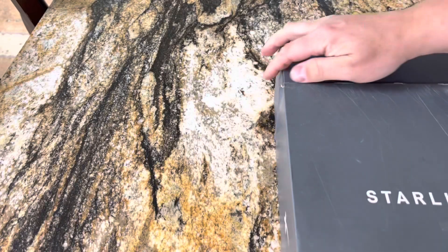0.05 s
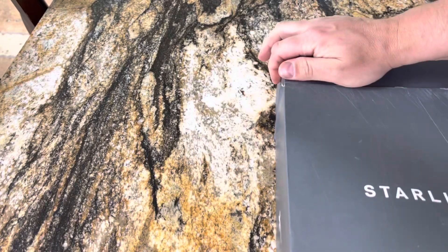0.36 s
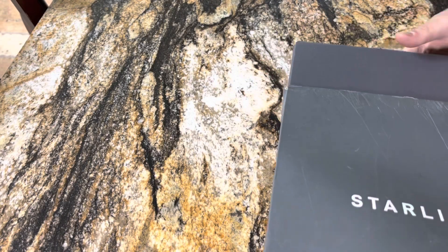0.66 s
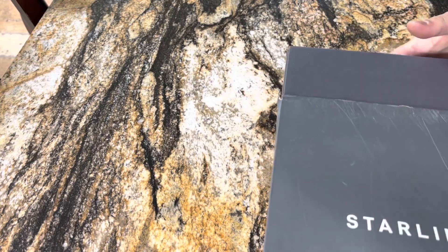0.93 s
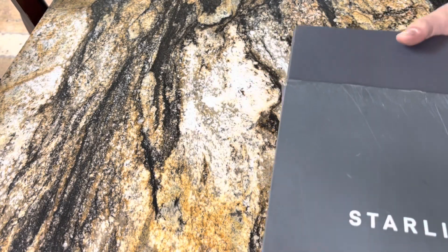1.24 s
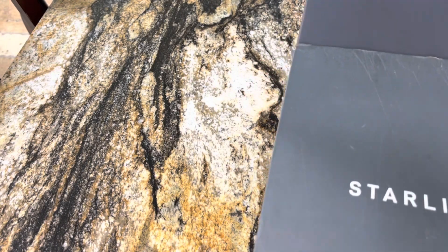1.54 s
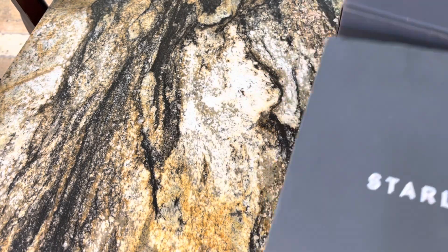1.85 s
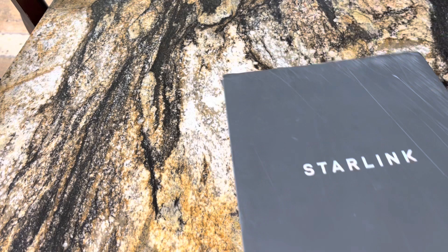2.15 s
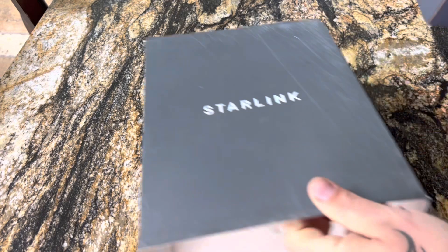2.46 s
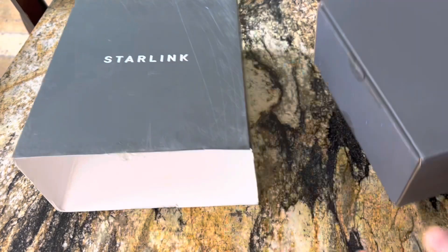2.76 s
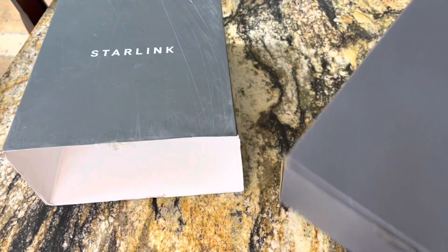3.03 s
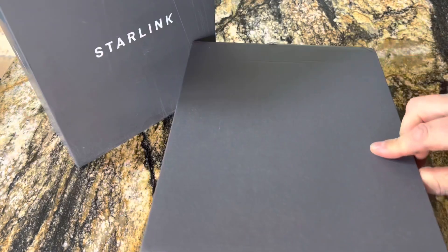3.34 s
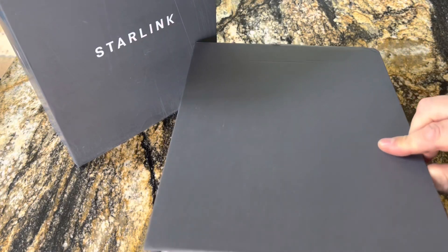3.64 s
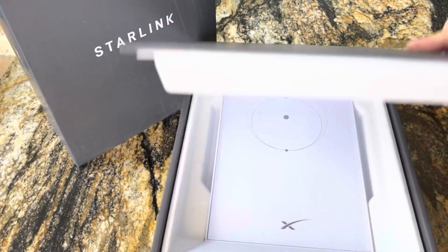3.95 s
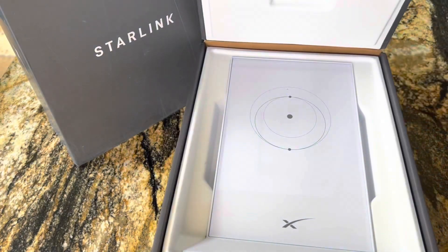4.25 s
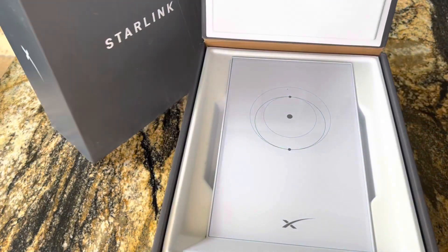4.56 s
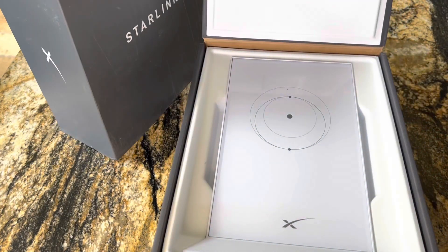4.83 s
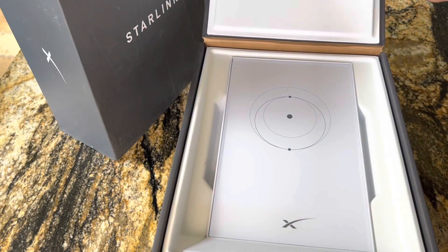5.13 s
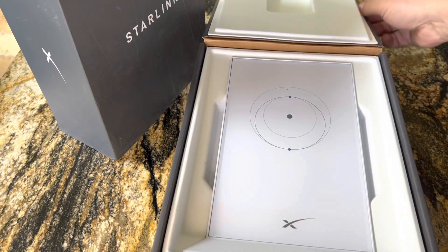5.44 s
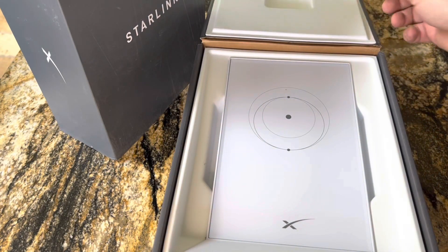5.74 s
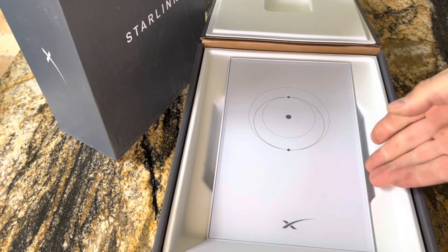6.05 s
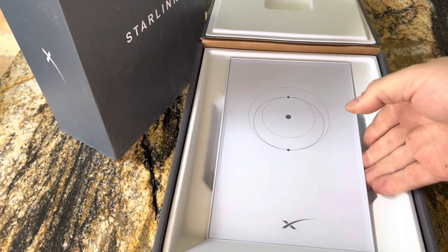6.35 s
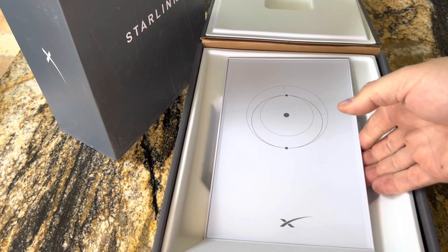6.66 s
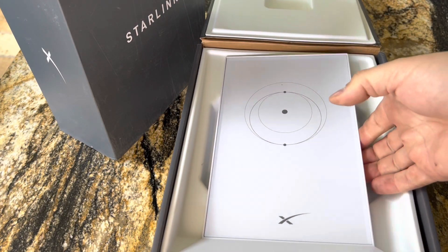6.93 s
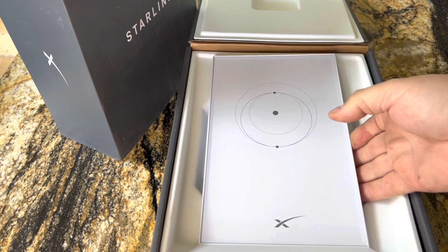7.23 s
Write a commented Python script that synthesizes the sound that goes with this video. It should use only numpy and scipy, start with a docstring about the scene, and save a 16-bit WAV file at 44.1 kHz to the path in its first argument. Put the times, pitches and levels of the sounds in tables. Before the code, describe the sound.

Hands rub and shift a rigid cardboard box close to a stereo pair of microphones, with light taps, scrapes and a firmer knock at about 0.7 seconds. From 1.4 seconds the box rasps out of its sleeve, card squeaking and groaning against card, until a bump and a sharp snap free it at 1.9. Skin brushes the card and small ticks follow. At 3.1 and 3.3 seconds the box lands on a stone countertop in two solid knocks, with a short drag between them. Quieter rubs and taps continue as the lid swings open. At 5.5 seconds it flops back with the loudest knock and a brief rattle. From 6 to about 7.2 seconds fingers rub, tick and tap softly at the tray inside. The kitchen's hard walls give the knocks a short echo, and a low appliance hum runs underneath.

```python
"""A live kitchen, a stereo pair of microphones close to a stone countertop, a low hum underneath.
A rigid cardboard box is drawn out of its sleeve: card rubs and squeals on card in stick-slip,
and the empty sleeve snaps free. The box is set down in two knocks with a short drag between them,
its lid swings open and flops back, and fingers work at the tray inside. Each knock cracks, flexes
and rings a panel, and the hard walls answer."""
import sys
import numpy as np
from scipy import signal
from scipy.fft import rfft, irfft, next_fast_len
from scipy.io import wavfile
from scipy.ndimage import map_coordinates

SR = 44100
rng = np.random.default_rng(int(sys.argv[2]) if len(sys.argv) > 2 else 0)


def waveform_to_disk(signal):
    """Save audio, clipped to [-1, 1], as 16-bit WAV at the path in sys.argv[1]."""
    frames = np.transpose(np.atleast_2d(signal))
    scaled = np.clip(frames, -1, 1) * 32767
    samples = np.round(scaled).astype(np.int16)
    wavfile.write(sys.argv[1], SR, samples)


N = 321577
TIME = np.arange(N) / SR
CUTOFF_HZ = 16100
RUB_ATTACK_S, RUB_RELEASE_S = 0.036, 0.03

# spectra of the noises at the microphones: (frequency [Hz], relative density [dB])
AIR_SPECTRUM = [(25, -19.5), (64, -2), (145, -7.5), (293, -7.5), (516, -18), (1500, -26.5), (3000, -35),
                (7000, -42.5), (16000, -62)]
BRUSH_SPECTRUM = [(1500, -13), (4000, -3), (6200, -3.5), (8700, 4), (12000, 2), (15500, -6.5)]
RUB_SPECTRUM = [(120, -3), (300, -0.5), (480, -5.5), (720, -6), (1300, -3.5), (1700, -4), (2100, -5.5),
                (2700, -10), (4200, -13), (6200, -19), (8700, -12.5), (15000, -24.5)]
CARD_CRACK_SPECTRUM = [(300, -21), (900, -5), (1900, -9.5), (5000, -24), (10000, -26.5), (16000, -37)]
SLIDE_SPECTRUM = [(120, -5), (330, 2.5), (600, -1), (1100, -9), (2100, -8.5), (2800, -16), (6000, -21.5),
                  (11500, -19), (16000, -32)]
LOW_SWELL_SPECTRUM = [(20, -33), (40, -12), (58, 30), (85, 11), (130, -9.5), (260, -39)]
DRAG_SPECTRUM = [(100, -11), (240, -1), (700, -12), (1100, -13.5), (2800, -31), (9000, -31), (16000, -34)]
TRAY_CRACK_SPECTRUM = [(650, -10.5), (950, 1.5), (1250, -10), (1650, -7), (2100, -14.5), (4000, -16),
                       (5200, -24.5), (9000, -20.5), (16000, -23)]
# an appliance hums: (frequency [Hz], relative level [dB])
HUM_TONES = [(59.2, -55.5), (102.3, -64.5)]
# skin over smooth card: (start [s], length [s], level [dB])
SKIN_BRUSHES = [(-0.04, 0.14, -52.5), (0.393, .11, -46.5), (1.16, 0.14, -58), (1.947, 0.19, -52),
                (2.273, 0.028, -41), (2.369, 0.096, -48), (2.527, 0.24, -53.5), (5.174, 0.24, -70)]
# card shifts under the hands: (start [s], length [s], rasp level [dB], brightness [dB])
CARD_RUBS = [(-0.03, 0.69, -54.5, 4), (0.47, 0.085, -48.5, -3), (0.603, 0.045, -48, -1.5),
             (0.699, 0.083, -52, -4.5), (0.753, 0.19, -58.5, 4), (1.038, 0.045, -48, -6),
             (1.093, 0.063, -55, 3), (1.167, 0.068, -48, 0), (1.235, 0.21, -59, -1),
             (2.13, 0.37, -55.5, 4.5), (2.604, 0.13, -81, -6), (3.531, 0.16, -62, 3.5),
             (3.758, 0.38, -67, -5), (4.85, 0.17, -62.5, 5.5), (5.063, 0.079, -61, -6),
             (5.976, 0.18, -56.5, -3), (6.152, 0.088, -54, -5), (6.887, 0.28, -57.5, -2.5),
             (7.086, 0.11, -48, -1)]
# edges scrape with a ring: (start [s], length [s], resonance [Hz], level [dB])
EDGE_SCRAPES = [(0.056, 0.21, 1950, -59), (0.267, 0.073, 7830, -47), (0.457, 0.13, 2000, -48.5),
                (0.494, 0.08, 714, -45), (1.57, 0.042, 288, -32), (1.674, 0.045, 2080, -29.5),
                (2.576, 0.035, 574, -43.5), (2.674, 0.16, 3430, -60.5), (3.967, 0.2, 1680, -65.5),
                (4.498, 0.06, 4400, -61.5)]
# blows on the full box, the empty sleeve, and the lid and moulded tray:
# (time [s], relative level [dB], flex pitch [Hz], hardness [dB], room send [dB])
BOX_BLOWS = [(0.162, -30.5, 167, -50, -38), (0.65, -20.5, 221, -36, -16), (0.771, -36.5, 227, -10.5, -4),
             (1.067, -32, 295, -38, -8.5), (1.08, -38, 690, -4.5, -15), (1.203, -30.5, 352, -38, -5),
             (1.232, -50, 654, 9.5, -29), (1.813, -17, 393, -42, -16.5), (1.82, -21.5, 168, -25, -13.5),
             (2.553, -35, 430, -22.5, -4), (2.607, -32.5, 250, -41, -9.5), (3.098, -28, 108, -25, -26),
             (3.127, -13.5, 740, -16.5, -26.5), (3.128, -10.5, 258, -42, -17.5),
             (3.3058, -15, 645, -17.5, -50.5), (3.3075, -7, 196, -35, -69), (3.518, -37, 235, -50, -4),
             (3.798, -44, 510, -24.5, -17), (3.9255, -34.5, 460, -38, -23), (3.966, -39, 220, -23, -16),
             (4.597, -43, 477, -17, -8)]
SLEEVE_BLOWS = [(1.9134, -9.5, 780, -1, -9.5), (1.9285, -19.5, 560, -32, -6), (1.9338, -17, 310, -42, -11)]
TRAY_BLOWS = [(4.433, -34, 860, -8, -3.5), (5.4883, -1.5, 455, -20, -11.5), (5.5188, -16.5, 476, -19, -20),
              (5.524, -16.5, 320, -27, -28), (5.543, -23, 433, -24, -24), (5.9895, -40.5, 245, -13, -31),
              (6.047, -30.5, 372, -38, -6.5), (7.067, -32, 383, -22, 1), (7.117, -30, 252, -31, -22)]
# the modes each one rings with: (frequency [Hz], relative level [dB], t60 [s])
BOX_RING = [(231, -15.5, 0.15), (388, -1, 0.064), (554, 8.5, 0.034), (684, 1, 0.038), (915, 0.5, 0.036),
            (1212, -3.5, 0.036), (1530, 1, 0.028), (2250, -9, 0.026)]
SLEEVE_RING = [(322, -10.5, 0.052), (575, -2.5, 0.065), (660, -11, 0.092), (1075, -9.5, 0.089),
               (1644, -8.5, 0.018), (2010, -4, 0.018), (3050, -16, 0.0087)]
TRAY_RING = [(132, -9.5, 0.15), (296, -1, 0.06), (444.5, -15, 0.43), (571, -8.5, 0.26), (518, -19, 0.9),
             (914, -22.5, 0.4)]
# the kitchen's reverberation: (frequency [Hz], relative level [dB], t60 [s])
ROOM_TAIL = [(100, 2.5, 0.96), (283.5, 14.5, 0.43), (447, -4.5, 1), (880, 3.5, 0.96), (2015, 4, 0.97),
             (5440, 7, 0.83), (8470, 13, 0.56), (15400, -15, 0.17)]
# fingernails and card edges catch: (time [s], level [dB], centre [Hz])
NAIL_TICKS = [(0.471, -30.5, 3530), (2.305, -51, 9400), (2.574, -38, 7500), (2.596, -39, 1480),
              (2.741, -40, 11000), (2.861, -41, 10500), (3.011, -55.5, 4030), (3.0883, -47, 9350),
              (4.434, -37, 2200), (4.442, -40, 1400), (4.45, -39.5, 2900), (4.952, -51.5, 10000),
              (5.509, -35, 9000), (5.519, -35, 3000), (6.642, -50.5, 5150), (6.667, -45.5, 5600),
              (7.154, -35, 1670)]
# speed of the box leaving the sleeve, given as its rasp: (time [s], level [dB])
SLIDE_RASP = [(1.41, -61.5), (1.5, -31.5), (1.575, -24.5), (1.66, -33), (1.73, -27), (1.8, -33),
              (1.855, -42), (1.875, -60), (1.905, -50)]
# brief squeaks: (start [s], length [s], first pitch [Hz], last pitch [Hz], relative level [dB])
SLEEVE_SQUEAKS = [(1.478, .04, 580, 640, -28), (1.533, .04, 640, 670, -33), (1.49, .06, 880, 1250, -34),
                  (1.558, .04, 1780, 1600, -29), (1.704, .018, 740, 860, -25),
                  (1.74, .055, 1150, 1020, -31), (1.762, .016, 2010, 1970, -23),
                  (1.755, .055, 2600, 3200, -39)]
# one stick-slip tone where the sleeve grips hardest: (time [s], pitch [Hz], relative level [dB])
SLEEVE_GROAN = [(1.588, 725, -31), (1.602, 720, -25), (1.635, 655, -28), (1.674, 475, -20),
                (1.694, 620, -27)]
# brief swells of low rumble: (start [s], length [s], level [dB])
LOW_SWELLS = [(1.813, 0.041, -32), (1.935, 0.088, -34.5), (3.095, 0.12, -37), (4.981, 0.12, -35),
              (6.724, 0.15, -42.5)]
# width of the stereo image: (frequency [Hz], side minus mid [dB])
STEREO_WIDTH = [(60, -17.5), (200, -14), (380, -6), (700, -4), (1290, -5), (2380, -3.5), (5500, -2),
                (8500, -13.5), (15000, -64)]
# balance of the microphones: (frequency [Hz], left minus right [dB])
MIC_BALANCE = [(60, 0.5), (200, -1.7), (450, 0), (1200, 0.7), (3500, 2.5), (8000, 0.5)]
# phase between the microphones: (frequency [Hz], lead of the left [rad])
MIC_PHASE = [(300, 0), (1500, -0.8), (3400, 0.5), (7300, 1), (8600, 0), (10200, -3.1), (11700, -6.2),
             (12700, -6.6), (13700, -9.4), (15200, -12.5)]


def from_db(db):
    """Decibels to gain."""
    return 10 ** (np.asarray(db) / 20)


def rms_one(x):
    """Scale to unit power."""
    return x / np.sqrt(np.mean(x ** 2) + 1e-20)


def at_hz(points, hz, column=1):
    """Read a table along log frequency."""
    table = np.array(points)
    return np.interp(np.log(np.maximum(hz, 1)), np.log(table[:, 0]), table[:, column])


def add(track, s, sound):
    """Mix a sound into a track at a time."""
    start = max(round(s * SR), 0)
    track[:, start:start + sound.shape[-1]] += sound[..., :N - start]


def band(x, low_hz, high_hz, order=2):
    """Butterworth band-pass."""
    sos = signal.butter(order, [low_hz, min(high_hz, .48 * SR)], "band", fs=SR, output="sos")
    return signal.sosfilt(sos, x)


def resonance(x, hz, octaves):
    """One band of a given width, at unit power."""
    return rms_one(band(x, hz * 2 ** (-octaves / 2), hz * 2 ** (octaves / 2)))


def drift(rate):
    """A random wander that turns about rate times a second."""
    knots = rng.standard_normal(N // 8)
    return np.interp(TIME * rate * 2, np.arange(len(knots)), knots)


def swell(length_s):
    """A smooth rise and fall."""
    return np.sin(np.linspace(0, np.pi, int(length_s * SR)))


def stroke(start_s, length_s, attack_s, release_s):
    """A movement gets going, holds and dies away."""
    age = TIME - start_s
    return np.clip(age / attack_s, 0, 1) * np.exp(-np.clip((age - length_s) / release_s, 0, 30))


def coloured(pair, spectrum):
    """Shape two excitations as mid and side; gives left and right at unit power."""
    size = next_fast_len(N)
    hz = np.arange(size // 2 + 1) * SR / size
    mid, side = rfft(pair, size) * from_db(at_hz(spectrum, hz)) * hz / (hz + 10)
    side = side * from_db(at_hz(STEREO_WIDTH, hz))
    return rms_one(irfft(np.array([mid + side, mid - side]), size)[:, :N])


def noise(spectrum):
    """Stereo noise with a spectrum."""
    return coloured(rng.standard_normal((2, N)), spectrum)


def friction(spectrum, grains_per_s, grain_db):
    """Fibres catch and let go in dense tiny slips."""
    slips = rng.random(N) < grains_per_s / SR
    strength = from_db(grain_db * np.minimum(rng.exponential(1, N), 4))
    return coloured(slips * strength * rng.standard_normal((2, N)), spectrum)


def rubbing(gains, spectrum, grains_per_s, grain_db, judder_db):
    """Under friction the panel booms, the surface rasps and hisses; gains are body, rasp and hiss."""
    slips = friction(spectrum, grains_per_s, grain_db)
    zones_hz = [(120, 800), (800, 5000), (5000, 17000)]
    rub = sum(rms_one(band(slips, *zone, order=3)) * gain for zone, gain in zip(zones_hz, gains))
    return rub * from_db(judder_db * drift(45))


def room_tone(air_db, hum_gain_db, waver_db):
    """Room air and the wavering hum of an appliance."""
    hum = 0
    for hz, db in HUM_TONES:
        amplitude = np.sqrt(2) * from_db(db + hum_gain_db + waver_db * drift(5))
        hum += amplitude * np.sin(2 * np.pi * hz * TIME + 0.11 * drift(2.7))
    return from_db(air_db) * noise(AIR_SPECTRUM) + hum


def skin_brushes(flutter_db):
    """Skin is too light to move the panel: it only hisses and crackles finely."""
    touch = sum(from_db(db) * stroke(s, length, attack_s=0.053, release_s=0.041)
                for s, length, db in SKIN_BRUSHES)
    flutter = from_db(flutter_db * drift(30))
    return touch * flutter * friction(BRUSH_SPECTRUM, grains_per_s=5600, grain_db=1)


def card_rubs(body_db, hiss_db):
    """Card shifts on card under the hands; a brighter rub trades body for hiss."""
    power = 0
    for s, length, db, bright in CARD_RUBS:
        gains = from_db([[db + body_db - bright], [db], [db + hiss_db + bright]])
        power += (gains * stroke(s, length, RUB_ATTACK_S, RUB_RELEASE_S)) ** 2
    return rubbing(np.sqrt(power), RUB_SPECTRUM, grains_per_s=4000, grain_db=1, judder_db=2)


def edge_scrapes(octaves):
    """An edge scrapes and the card under it sings in one resonance, set by where it is held."""
    slips = friction(RUB_SPECTRUM, grains_per_s=1900, grain_db=-1.5)
    return sum(from_db(db) * resonance(slips, hz, octaves) * stroke(s, length, RUB_ATTACK_S, RUB_RELEASE_S)
               for s, length, hz, db in EDGE_SCRAPES)


def knocks(blows, modes, crack_spectrum, flex_db, crack_db, crack_t60, ring_db, ring_follows,
           ring_rise_s, cycles, tightness, bend, pan_db):
    """A blow cracks the surface, flexes the panel and rings its modes; gives direct sound and room feed."""
    direct, feed = np.zeros((2, 2, N))
    grit, t = noise(crack_spectrum), TIME[:SR]
    crack_rise = 1 - np.exp(-t / 0.00088)
    mode_hz, mode_db, mode_t60 = np.transpose(modes)[:, :, None]
    decay = from_db(mode_db - 60 * t / mode_t60) * (1 - np.exp(-t / ring_rise_s))
    rings = decay * np.exp(2j * np.pi * mode_hz * t)
    spread = from_db(at_hz(STEREO_WIDTH, mode_hz[:, 0]))
    for s, db, hz, hardness, send_db in blows:
        # bending waves are dispersive: with bend below 1 the pitch of the flex sinks
        age = t * hz / cycles
        pulse = (age * np.exp(1 - age)) ** tightness
        flex = pulse * np.sin(2 * np.pi * cycles * age ** bend / bend)
        flex = band(flex, 0.29 * hz, CUTOFF_HZ, order=1)  # an open panel radiates little bass
        # each blow weights the modes anew, and each reaches the two microphones with its own phase
        strength, skew = rng.standard_normal((2, len(modes)))
        phases = np.exp(1j * spread * np.sign(skew) * [[.7], [-.7]])
        weights = from_db(0.5 * strength) * (-1) ** np.arange(len(modes)) * phases
        ring = from_db(ring_db + ring_follows * hardness) * (weights @ rings).imag
        crack = np.roll(grit, -round(s * SR), axis=1)[:, :len(t)] * crack_rise
        crack *= from_db(hardness + crack_db - 60 * t / crack_t60)
        knock = from_db(db) * (from_db(flex_db) * flex + ring + crack)
        add(direct, s, knock * from_db([[pan_db / 2], [-pan_db / 2]]))
        add(feed, s, knock * from_db(send_db))
    return np.array([direct, feed])


def kitchen(feed, build_s, side_db):
    """Hard walls give a diffuse tail that builds up and dies band by band."""
    t, response = TIME[:SR * 5 // 4], 0
    white = rng.standard_normal((2, 2, len(t)))
    edges_hz = np.geomspace(70, 17000, 15)
    for k, (low, high) in enumerate(zip(edges_hz, edges_hz[1:])):
        hz = np.sqrt(low * high)
        mid, side = band(white[k % 2], low, high)
        pair = mid + from_db(at_hz(STEREO_WIDTH, hz) + side_db) * side * [[1], [-1]]
        response += pair * from_db(at_hz(ROOM_TAIL, hz) - 60 * t / at_hz(ROOM_TAIL, hz, column=2))
    response *= (1 - np.exp(-(t / build_s) ** 2)) * np.sqrt(10 / SR)
    return signal.fftconvolve(feed, response, axes=1)[:, :N]


def nail_ticks(octaves, t60, send_db):
    """Small catches of a nail or an edge, each with its own pitch; gives direct sound and room feed."""
    direct, grit, t = np.zeros((2, N)), noise(CARD_CRACK_SPECTRUM), TIME[:SR // 10]
    for s, db, hz in NAIL_TICKS:
        click = resonance(grit[:, round(s * SR):][:, :len(t)], hz, octaves)
        add(direct, s, click * from_db(db - 60 * t / t60))
    return np.array([direct, direct * from_db(send_db)])


def sleeve_slide(body_db, body_follows, hiss_db, hiss_follows):
    """The box rasps out of its sleeve; body and hiss follow its speed, each by its own share."""
    times, levels = np.transpose(SLIDE_RASP)
    rasp_db = np.interp(TIME, times, levels)
    speed_db = rasp_db + 29.5  # zero at a brisk pull
    touch = stroke(times[0], times[-1] - times[0], attack_s=0.024, release_s=0.014)
    gains = from_db([body_db + body_follows * speed_db, rasp_db, hiss_db + hiss_follows * speed_db])
    return rubbing(touch * gains, SLIDE_SPECTRUM, grains_per_s=9000, grain_db=2, judder_db=1.3)


def sleeve_cavity(slide, delays_s, echo_db):
    """The cavity in the sleeve deepens as the box leaves it, so its resonances glide down."""
    delay = np.interp(TIME, [SLIDE_RASP[0][0], SLIDE_RASP[-1][0]], delays_s)
    gain, echoes = from_db(echo_db), 0
    for k in range(3):
        delayed = [map_coordinates(channel, [(TIME - k * delay) * SR], order=3) for channel in slide]
        echoes += gain ** k * np.array(delayed)
    return echoes / np.sqrt(1 + gain ** 2 + gain ** 4)


def squeals(waver, flutter_db, overtone_db):
    """The sleeve grips and slips in gliding, unsteady tones: a groan with overtones and short squeaks."""
    wobble = 1 + waver * drift(160)
    flutter = from_db(flutter_db * drift(110))
    times, pitches, levels = np.transpose(SLEEVE_GROAN)
    phase = 2 * np.pi * np.cumsum(np.interp(TIME, times, pitches) * wobble) / SR
    phase = phase + rng.normal(0, 0.21, (2, 1))
    groan = np.sin(phase) + from_db(overtone_db) * (np.sin(2 * phase) + np.sin(3 * phase))
    grip = stroke(times[0], times[-1] - times[0], attack_s=.004, release_s=.004)
    tones = rms_one(groan) * from_db(np.interp(TIME, times, levels)) * grip
    for s, length, first_hz, last_hz, db in SLEEVE_SQUEAKS:
        shape = swell(length)
        hz = np.linspace(first_hz, last_hz, len(shape)) * wobble[round(s * SR):][:len(shape)]
        squeak = rms_one(np.sin(2 * np.pi * np.cumsum(hz) / SR))
        add(tones, s, from_db(db) * squeak * shape)
    return tones * flutter * from_db([[-3], [1.5]])  # toward the right microphone


def low_swells():
    """Brief swells of low rumble near 58 Hz, about the pitch of the hum."""
    envelope = np.zeros((2, N))
    for s, length, db in LOW_SWELLS:
        add(envelope, s, from_db(db) * swell(length))
    return envelope * noise(LOW_SWELL_SPECTRUM)


def stone_drag(start_s, length_s, body_db, rasp_db, hiss_db, tilt_db_per_s):
    """The box is dragged on one edge over the stone; as it gathers speed, rumble gives way to hiss."""
    from_halfway_s = np.clip(TIME - start_s, 0, length_s) - length_s / 2
    tilt_db = tilt_db_per_s * from_halfway_s * [[-1], [0], [1]]
    gains = from_db(tilt_db + [[body_db], [rasp_db], [hiss_db]])
    touch = stroke(start_s, length_s, attack_s=0.0051, release_s=0.0045)
    return rubbing(touch * gains, DRAG_SPECTRUM, grains_per_s=6100, grain_db=1, judder_db=0)


def scene():
    """Close handling on the counter; knocks, ticks and the slide also carry into the kitchen."""
    rubs = card_rubs(body_db=3.5, hiss_db=-7.5)
    slide = sleeve_slide(body_db=-37.5, body_follows=0.26, hiss_db=-36, hiss_follows=0.83)
    slide = sleeve_cavity(slide, delays_s=(.0013, .0022), echo_db=-12)
    slide += squeals(waver=.042, flutter_db=3.8, overtone_db=-13)
    drag = stone_drag(3.088, length_s=0.22, body_db=-38, rasp_db=-46, hiss_db=-54.5, tilt_db_per_s=67)
    box = knocks(BOX_BLOWS, BOX_RING, CARD_CRACK_SPECTRUM, flex_db=0, crack_db=12, crack_t60=0.022,
                 ring_db=2.5, ring_follows=0.49, ring_rise_s=0.0012,
                 cycles=1.47, tightness=7.1, bend=0.858, pan_db=-2)
    sleeve = knocks(SLEEVE_BLOWS, SLEEVE_RING, CARD_CRACK_SPECTRUM, flex_db=2, crack_db=5,
                    crack_t60=0.027, ring_db=3.5, ring_follows=0.074, ring_rise_s=0.0013,
                    cycles=1.31, tightness=18, bend=0.69, pan_db=-1)
    tray = knocks(TRAY_BLOWS, TRAY_RING, TRAY_CRACK_SPECTRUM, flex_db=0.5, crack_db=9.5,
                  crack_t60=0.029, ring_db=-14, ring_follows=0, ring_rise_s=0.0075,
                  cycles=1.64, tightness=4.45, bend=1, pan_db=0)
    direct, feed = box + sleeve + tray + nail_ticks(octaves=1.36, t60=0.028, send_db=-11)
    room = kitchen(feed + from_db(-17.5) * slide, build_s=0.01, side_db=4)
    close = rubs + edge_scrapes(octaves=0.41) + slide + drag + direct
    ambience = low_swells() + room_tone(air_db=-54, hum_gain_db=2.3, waver_db=4.5)
    return close + skin_brushes(flutter_db=3) + room + ambience


def record(dry):
    """The two microphones differ in colour and phase; the highest peaks clip and the top is cut."""
    size = next_fast_len(N)
    hz = np.arange(size // 2 + 1) * SR / size
    lean, lead = at_hz(MIC_BALANCE, hz), at_hz(MIC_PHASE, hz)
    mics = from_db([lean / 2, -lean / 2]) * np.exp(1j * np.array([lead / 2, -lead / 2]))
    heard = irfft(rfft(dry, size) * mics, size)[:, :N]
    low_pass = signal.ellip(10, .1, 80, CUTOFF_HZ, fs=SR, output="sos")
    return signal.sosfilt(low_pass, np.clip(heard, -.98, .98))


dry = scene()
out = record(dry)
waveform_to_disk(out)
```